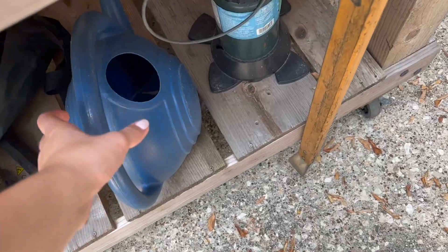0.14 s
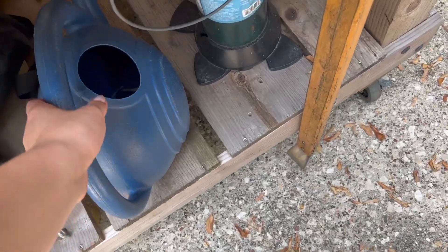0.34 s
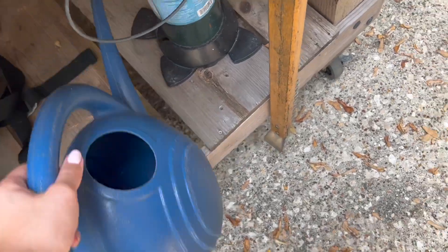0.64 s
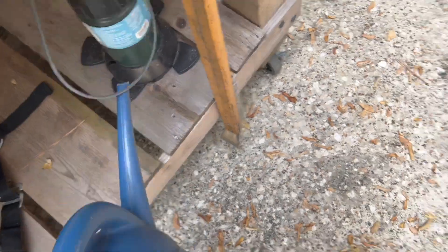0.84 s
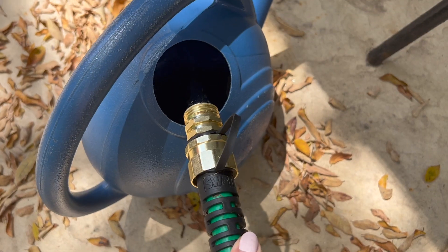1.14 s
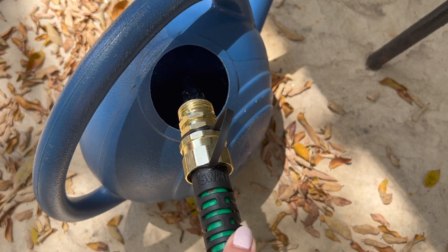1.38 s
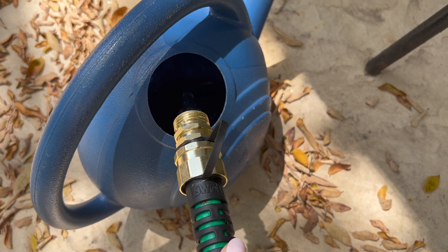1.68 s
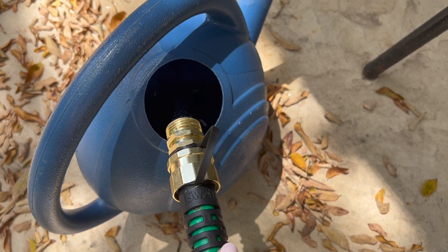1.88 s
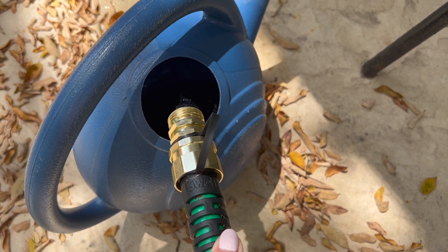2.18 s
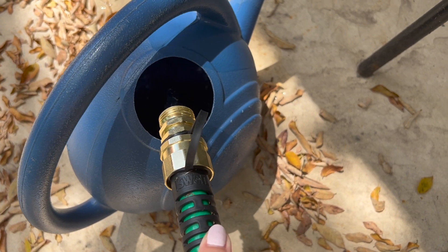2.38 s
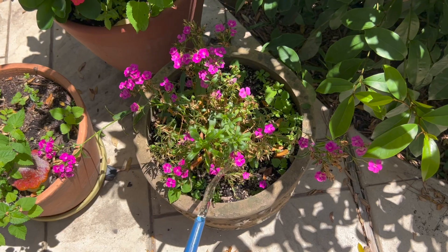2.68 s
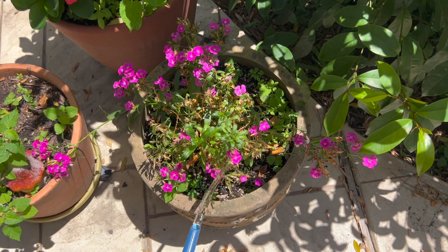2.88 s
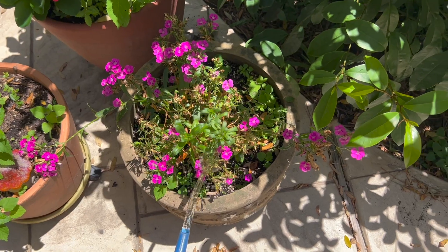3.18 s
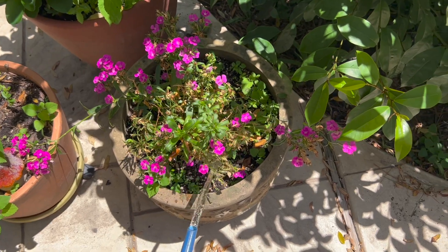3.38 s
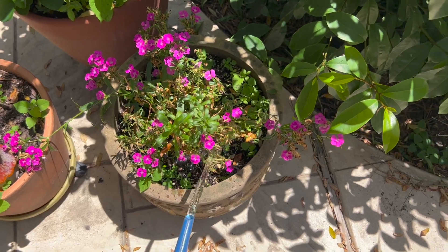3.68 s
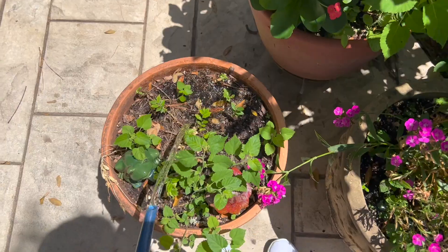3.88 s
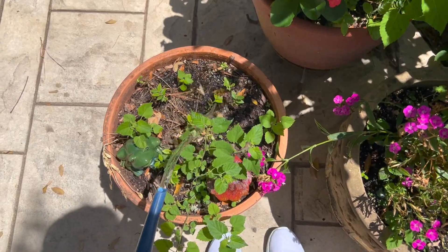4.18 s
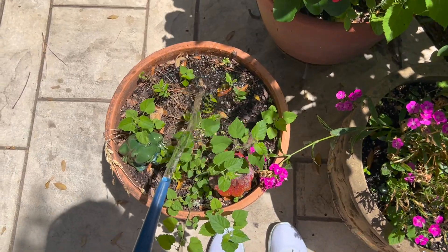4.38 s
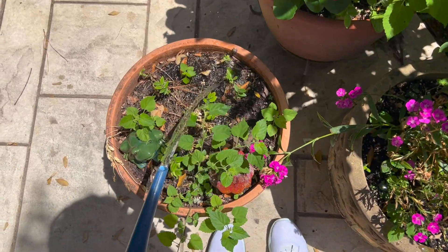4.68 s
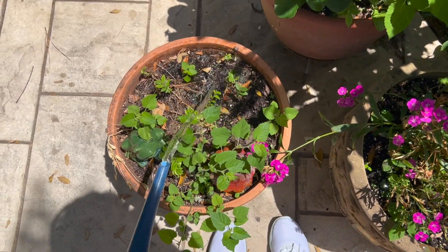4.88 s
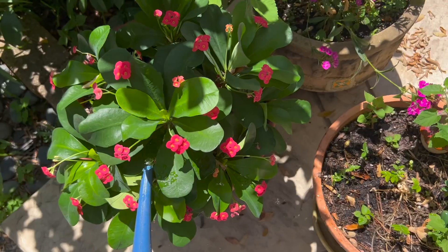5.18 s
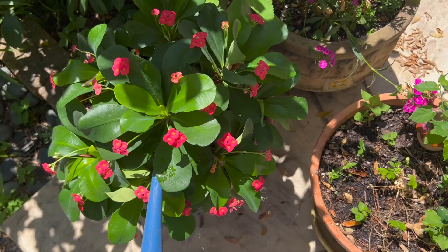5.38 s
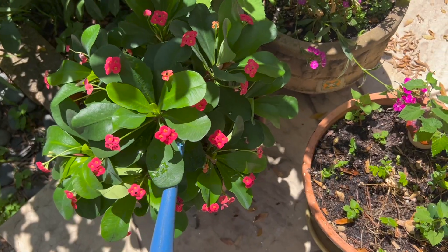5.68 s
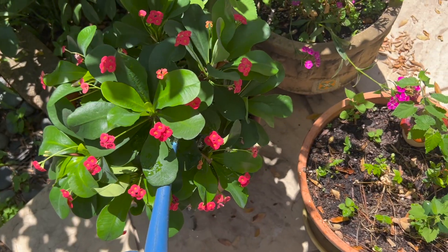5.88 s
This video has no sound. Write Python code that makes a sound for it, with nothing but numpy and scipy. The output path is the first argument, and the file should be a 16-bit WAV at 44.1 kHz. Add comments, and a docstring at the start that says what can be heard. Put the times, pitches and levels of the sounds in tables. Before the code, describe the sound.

Near silence with a dull rumbling air, broken by a loud hollow plastic knock and quick chatter. Next, water gurgles steadily into the can, with round plops, splashes and a motor droning nearby. Abruptly quieter, a thin stream patters on leaves and soil in two pots, then hisses and ticks faintly on a bush amid thin insect-like high tones. Close handheld stereo microphone outdoors, dry, with abrupt changes of place.

```python
"""Watering can on a patio

A plastic can, heard in stereo, knocks a shed shelf, is filled from a hose and waters three pots.
The knock is decaying can modes and noisy clatter; jet and poured stream are shaped noise and swarms of bubbles.
Around them lie washes of noise, low rumbles, thin high line combs and, near the tap, a machine of summed sines.
Five short passages follow one another: shed, tap, two pots, bush."""
import sys
import numpy as np
from scipy import signal
from scipy.fft import rfft, irfft, next_fast_len
from scipy.io import wavfile

SR = 44100
rng = np.random.default_rng(int(sys.argv[2]) if len(sys.argv) > 2 else 0)


def dump_mix(stems):
    """Bounce the given channels to the path in sys.argv[1] as a 16-bit WAV at rate SR."""
    frames = np.atleast_2d(stems).T  # one column per channel
    limited = np.clip(frames, -1, 1)  # hard clip at full scale
    pcm = np.round(limited * 32767).astype(np.int16)
    wavfile.write(sys.argv[1], SR, pcm)


N = 266716
SIZE = next_fast_len(N, True)
TIME = np.arange(N) / SR
HZ = np.fft.rfftfreq(SIZE, 1 / SR)
EDGE_HZ = 15900  # upper band limit

# The five places. Each: start in seconds, end in seconds.
SHED, FILL = (0, .96), (.93, 2.622)
POT_1, POT_2, BUSH = (2.612, 3.756), (3.77, 5.021), (5.056, 6.1)

# Steady wash at each place. Each row: frequency in Hz, density in dB per Hz.
SHED_AIR = [(25, -77), (55, -67), (200, -77), (330, -82.5), (600, -84.5), (1300, -88), (1900, -95.5),
            (3800, -92.5), (6200, -96.5), (8200, -92.5), (11800, -108.0), (15500, -107.0)]
FILL_RUSH = [(20, -115), (55, -60), (120, -64), (180, -71), (300, -76.5), (600, -76), (1300, -82.5),
             (1700, -86.5), (3000, -88), (6000, -90.5), (7200, -88.5), (10500, -100), (15500, -97)]
POT_1_WASH = [(25, -90), (60, -68), (150, -75), (260, -75), (600, -80.5), (1100, -92.5), (1900, -100),
              (2700, -95.5), (4500, -90), (5800, -85.5), (8300, -84.5), (11000, -103), (15500, -93)]
POT_2_WASH = [(25, -80), (60, -72.5), (200, -71.5), (330, -79), (600, -79), (1100, -92.5), (2400, -99.5),
              (3500, -92), (5500, -88.5), (8300, -88), (11500, -102), (15500, -96)]
BUSH_WASH = [(25, -77), (60, -67.5), (200, -74.5), (320, -78.5), (550, -76.5), (1100, -92.5), (2400, -98),
             (3900, -92.5), (4700, -90), (6400, -85.5), (8800, -81.5), (9900, -114), (11500, -93.5),
             (15500, -100.0)]
# Correlation of the left and right channels. Each row: frequency in Hz, correlation from -1 to 1.
CORRELATION = [(60, 0.93), (200, 0.67), (500, -0.26), (1500, -0.06), (4000, 0.6), (7500, 0.55),
               (9700, -0.3), (11500, 0.3), (15000, 0.3)]
# Balance of the left and right channels. Each row: frequency in Hz, left minus right in dB.
LEAN = [(100, -1.5), (400, 0), (1300, 1), (3500, 4.5), (6000, 3), (7500, 0.5)]

# Machine near the tap: its motor speed and orders. Each row: multiple of the speed, relative level in dB.
MOTOR_HZ = 58.9
MOTOR_ORDERS = [(1, -52), (2, -55), (6, -65), (7, -53), (47, -66), (48, -62.5), (50, -59), (52, -68),
                (60, -69)]
# Tones of the machine's fan. Each row: frequency in Hz, relative level in dB.
FAN = [(54.9, -47), (109.8, -49.5), (121.5, -50.5), (383.5, -62.5), (726, -63.5), (1184, -66)]
# Low swells around the pots. Each row: peak time in seconds, level in dB rms,
# centre in Hz, half length in seconds (Gaussian).
SWELLS = [(2.8, -53, 123, 0.092), (2.8, -56, 420, 0.13), (3.4, -52, 430, .13), (3.45, -51, 211, .08),
          (3.6, -44.5, 232, 0.061), (3.57, -53.5, 440, 0.045), (3.78, -48.5, 215, 0.093),
          (4.05, -53, 414, 0.22), (4.43, -48, 204, 0.15), (4.35, -57, 396, 0.12), (4.55, -51, 595, 0.036),
          (4.78, -58, 630, 0.18), (4.93, -47.5, 168, 0.046), (5.25, -47.5, 164, 0.037),
          (5.32, -53, 625, 0.021), (5.55, -51, 70, 0.072), (5.78, -45, 73.3, 0.046),
          (6.0, -47.5, 195, 0.13), (6.03, -46.5, 430, .14)]
SWELL_WIDTH_SHARE = 0.16  # half width of a swell's band, in natural-log frequency
# Thin high buzzes. Each row: start in seconds, end in seconds, centre in Hz, line spacing in Hz,
# half width in Hz, relative level in dB.
BUZZES = [(2.61, 3.75, 7342, 543.9, 300, -69), (2.61, 3.75, 6254, 543.9, 750, -69),
          (4.58, 5.02, 8323, 287.2, 300, -70), (3.77, 4.08, 8616, 287.2, 700, -67),
          (5.05, 6.1, 6469, 497.3, 1500, -63), (5.05, 6.1, 6294, 497, 700, -68),
          (5.05, 6.1, 8035, 497, 1400, -63), (5.2, 6.1, 8387, 497, 1200, -64)]
# Thin held tones. Each row: start in seconds, end in seconds, frequency in Hz, relative level in dB.
TONES = [(2.61, 3.75, 5711, -57.5), (2.61, 3.4, 5167, -58.5), (3.9, 4.5, 4307, -63),
         (4.42, 4.86, 4392, -61.5), (5.24, 5.88, 4231, -58.5), (5.3, 6.1, 4307, -63.5),
         (5.75, 6.1, 4231, -66), (5.3, 6.1, 5475, -65), (5.05, 5.7, 5230, -67), (3.77, 4.06, 7757, -59),
         (4.3, 5.02, 7176, -66), (3.8, 5.02, 1464, -75), (5.05, 6.1, 1468, -71)]

# Blows on the can. Each row: start in seconds, relative ring in dB, centre of the excited modes in Hz,
# relative clatter in dB, clatter decay in seconds (to 1/e).
BLOWS = [(.744, -11.5, 2400, -15.5, 0.032), (0.7442, -42, 6500, -25, .004),
         (0.7506, -13, 910, -20.5, 0.074), (0.762, -10, 7000, -24.5, 0.016),
         (0.777, -18, 3830, -20.5, 0.037), (0.811, -25, 930, -26, 0.029), (0.8425, -31, 8400, -22.5, 0.015),
         (0.85, -38, 1170, -39, 0.036), (0.85, -21.5, 7350, -24.5, 0.023), (.880, -30.5, 1080, -39, 0.024)]
# Modes of the can. Each row: frequency in Hz, relative level in dB, 60 dB decay in seconds,
# left minus right in dB.
CAN = [(194.6, 1, 0.11, 4), (224, -1, 0.11, 7), (647, -11, 0.09, 11), (770, -8, 0.1, 11),
       (1164, -5.5, 0.029, 24), (1250, -9, 0.058, 26), (1274, -14, 0.058, 20), (1744, -10, 0.063, -1),
       (2027, -6.5, 0.046, 7), (2170, -18, 0.16, 9), (2430, -11, 0.019, 21), (3300, -20, 0.069, -3),
       (4354, -10.5, 0.16, 3), (4815, -18.5, 0.11, 1), (5880, -26, 0.067, -2), (7365, -15, 0.099, -1),
       (8500, -20, .14, 0), (14760, -18, .1, 0), (15504, -14, 0.2, 0)]
# Colour of the clatter. Each row: frequency in Hz, relative level in dB.
CLATTER = [(60, 2), (200, 25), (400, 8.5), (1000, 6), (2300, -2), (3300, -9), (5000, -7), (8000, -4.5),
           (11000, -4.5), (15500, -4.5)]
# Plastic wall: typical 60 dB decay in seconds, energy share of the direct click, lowest mode in Hz.
WALL_T60_S, WALL_DIRECT_SHARE, WALL_LOW_HZ = .04, .5, 2500
# Dull bumps of the can in the hand. Each row: start in seconds, relative level in dB, pitch in Hz.
BUMPS = [(1.087, -21.5, 455), (5.001, -28, 430), (5.13, -41, 960), (5.178, -36.5, 780), (5.197, -33.5, 650),
         (.049, -37, 580)]
BUMP_RING_S = 0.016  # 60 dB decay
# Colour of a bump's thud. Each row: frequency in Hz, relative level in dB.
THUD = [(200, 4.0), (700, 0), (2500, -20), (8000, -37)]

# Fat drops on a leaf, trapping no bubble. Each row: start in seconds, relative level in dB.
LEAF_TICKS = [(2.953, -33), (2.988, -35), (3.033, -34.5), (3.116, -32), (3.486, -34.5), (3.673, -33.5),
              (3.735, -34), (3.835, -38), (4.604, -41), (5.297, -41)]
# Colour of a slap on water or leaf. Each row: frequency in Hz, relative level in dB.
SLAP = [(200, -22), (1500, 1), (4000, 5), (7500, 15), (11000, 3.5), (15500, 7.5)]
# Loudest splashes. Each row: start in seconds, bubble level in dB, bubble pitch in Hz, relative slap in dB.
SPLASHES = [(1.011, -42, 1120, -44), (1.13, -38, 2700, -54), (1.388, -44, 1144, -84),
            (1.502, -35.5, 1280, -46), (1.643, -29.5, 7340, -42), (1.69, -30, 1420, -31.5),
            (1.922, -39, 1116, -48), (2.005, -39, 5000, -47), (2.032, -34.5, 1260, -63),
            (2.092, -36.5, 2050, -31), (2.118, -31, 1244, -35), (2.436, -36.5, 1170, -32.5),
            (2.512, -40, 5640, -40.5), (2.552, -39.5, 1374, -63), (3.53, -44, 2580, -31),
            (4.333, -42, 3660, -33.5), (1.036, -44, 1220, -52), (1.465, -43, 2710, -39),
            (1.535, -42, 2180, -39), (1.571, -58, 5170, -43), (1.613, -42, 730, -60),
            (1.76, -46, 1290, -52), (1.896, -49, 703, -39), (2.015, -44, 1580, -60),
            (2.076, -43, 2820, -40), (2.282, -41, 1270, -54), (2.378, -40, 1390, -55),
            (2.416, -45, 5300, -40), (2.471, -42, 1380, -52), (2.607, -44, 5140, -41),
            (4.128, -40, 6780, -54), (4.224, -45, 1130, -60), (4.259, -39, 3800, -58),
            (4.42, -39, 5340, -44), (4.741, -48, 1850, -58), (4.176, -38.5, 3260, -52),
            (4.453, -40, 3320, -51), (4.531, -44, 1900, -53), (4.688, -44, 3630, -54),
            (4.865, -44.5, 3070, -62)]
# A bubble's 60 dB decay is RING_S at RING_HZ, shorter when smaller (higher); soil keeps only a share of it.
RING_S, RING_HZ, RING_SLOPE, SOIL_RING_SHARE = 0.065, 1310, 0.22, 0.43
# Lesser bubbles of a splash: relative level in dB, range in octaves, time spread as a share of the main ring.
HUDDLE_DB, HUDDLE_OCTAVES, HUDDLE_RINGS = -16, 0.88, .8
# Clumps of water bursting in the can or on plants. Each row: start in seconds, level in dB rms,
# centre in Hz, length in seconds.
CLUMPS = [(1.036, -43, 3760, 0.012), (1.088, -43, 1810, 0.009), (1.128, -46, 3900, 0.015),
          (1.163, -44.5, 4060, 0.013), (1.438, -54, 2180, 0.0089), (1.459, -43, 2170, 0.014),
          (1.501, -45, 1490, 0.0088), (1.537, -60, 4400, 0.014), (1.891, -47.5, 3020, 0.023),
          (1.923, -48, 2020, 0.019), (2.009, -47.5, 1680, 0.019), (2.073, -48, 3130, 0.013),
          (2.113, -48, 2250, 0.021), (2.315, -46, 4700, 0.033), (2.382, -45.5, 1640, 0.027),
          (2.416, -48, 4750, .014), (2.417, -47, 1300, 0.027), (2.468, -48, 1400, 0.018),
          (2.514, -47.5, 1940, 0.014), (2.552, -43.5, 1650, 0.016), (2.857, -56, 2300, 0.0061),
          (2.901, -51, 3150, 0.0086), (2.942, -55, 4000, 0.012), (2.958, -52, 3080, 0.0081),
          (2.98, -56, 3400, 0.0056), (3.023, -58, 1970, 0.02), (3.112, -48, 3080, 0.0035),
          (3.301, -52, 3040, 0.012), (3.421, -58, 3630, .008), (3.476, -53, 4130, 0.0098),
          (3.518, -48.5, 3130, 0.0082), (3.655, -53.5, 3320, 0.012), (3.721, -53.5, 2930, 0.022),
          (4.153, -51, 4400, 0.0092), (4.17, -53, 4000, 0.0067), (4.213, -56, 1320, 0.0097),
          (4.252, -57, 3600, 0.0046), (4.335, -51, 2680, 0.0078), (4.416, -50, 4960, 0.0081),
          (4.432, -46, 5000, 0.014), (4.442, -56, 2920, 0.021), (4.528, -55, 2320, 0.013),
          (4.593, -64, 2410, 0.011), (4.684, -50.5, 3600, 0.013), (4.701, -57, 2600, 0.0061),
          (4.737, -56, 2580, 0.011), (4.862, -58, 3200, 0.011), (1.012, -49, 1500, .012),
          (1.234, -50, 4000, 0.01), (1.258, -51, 1500, 0.018), (1.576, -53, 1910, .015),
          (2.185, -51, 1600, .02), (2.281, -50, 1490, .02)]
# Inside a clump: pitch range, cycles to a 60 dB decay, crowding to the start, greatest left-right scatter.
CLUMP_OCTAVES, CLUMP_CYCLES, CLUMP_FRONT, CLUMP_SCATTER_DB = 1.28, 15, 1.6, 24

# Water-filled can under the jet. Each row: resonance in Hz, width in Hz, level in dB rms.
HOLLOW = [(115.2, 10, -47), (233.4, 9.9, -55), (399, 49, -57), (1237, 17, -63), (1820, 15, -75),
          (2050, 28, -64.5), (2760, 17, -62.5), (7600, 130, -62)]
GURGLE_DB = -52.5  # rms of the even bubbling under the jet
# Surges of the jet. Each row: start in seconds, relative strength in dB.
SURGES = [(1.04, -55), (1.45, -49.5), (1.89, -69), (2.08, -59), (2.38, -61)]
SURGE_RISE_S, SURGE_SETTLE_S, CALM_DB = 0.083, 0.067, -69.5
# Colour of the spray in the can. Each row: frequency in Hz, relative level in dB.
SPRAY = [(200, -15), (700, -51), (1300, 9), (2200, -9), (4000, -8), (8000, -1), (15500, 4)]
# Passes of the stream over leaves. Each row: start in seconds, hold in seconds, relative spatter in dB.
PASSES = [(2.826, 1, -60.5), (4.12, 0.33, -64), (5.107, 0.29, -70)]
PASS_RISE_S, PASS_FADE_S, DRIBBLE_DB = 0.023, 0.22, -72  # only a dribble lands between passes
# Colour of drops on the plants. Each row: frequency in Hz, relative level in dB.
DROPS = [(200, -14), (700, 16), (1400, 6), (2700, 20), (4000, 23), (7500, 18), (11000, 13), (15500, 12)]


def amp(db):
    """Decibels to gain."""
    return 10 ** (np.asarray(db) / 20)


def evened(x):
    """Scaled to rms 1."""
    return x / np.sqrt(np.mean(abs(x) ** 2) + 1e-20)


def read(points, hz):
    """A spectrum table joined by lines on a log-frequency axis."""
    f, value = np.transpose(points)
    return np.interp(np.log(hz + 1), np.log(f + 1), value)


def add(mix, s, sound):
    """Mixes a sound in at time s."""
    part = mix[..., max(round(s * SR), 0):][..., :sound.shape[-1]]
    part += sound[..., :part.shape[-1]]


def during(start, end, fade=0.002):
    """1 between two times, with short ramps."""
    rise = np.clip((TIME - start) / fade, 0, 1)
    return rise * np.clip((end - TIME) / fade, 0, 1)


def filtered(x, gain):
    """x through a filter given as a gain for every frequency."""
    return irfft(rfft(x, SIZE) * gain, SIZE)[..., :N]


def drift(per_s):
    """Slow random wander of rms 1."""
    return evened(filtered(rng.standard_normal(N), np.exp(-(HZ / per_s) ** 2)))


def heard(envelope, colour):
    """Noise under an envelope, coloured, with left and right correlated and balanced by frequency."""
    a, b = rfft(rng.standard_normal((2, N)) * envelope, SIZE)
    correlation = np.clip(read(CORRELATION, HZ), -1, 1)
    lean = amp(read(LEAN, HZ) / 2)
    left = a * lean
    right = (correlation * a + np.sqrt(1 - correlation ** 2) * b) / lean
    return irfft(np.array([left, right]) * colour, SIZE)[:, :N]


def bursts(sizes, decay):
    """Envelope of impacts that start at once and die exponentially."""
    power = signal.lfilter([1], [1, -np.exp(-2 / (decay * SR))], sizes ** 2)
    return np.sqrt(power + 1e-20)


def patter(per_s, spread_db, decay):
    """Envelope of randomly falling drops, mostly small, a few large, rms 1."""
    falls = rng.random(N) < per_s / SR
    sizes = amp(spread_db * np.minimum(rng.exponential(1, N), 4)) * falls
    return evened(bursts(sizes, decay))


def resonance(hz, width):
    """A narrow resonance excited at random, rms 1."""
    return evened(filtered(rng.standard_normal(N), 1 / (1 + ((HZ - hz) / width) ** 2)))


def bubble(hz, t60, rise=0.053):
    """A trapped bubble rings and dies away, its pitch rising as it nears the surface."""
    t = np.arange(0, t60, 1 / SR)
    envelope = amp(-60 * t / t60) * (1 - np.exp(-t * hz))
    return envelope * np.sin(2 * np.pi * hz * t * (1 + rise * t / t60))


def bubbles(count, passage, low_hz, high_hz, cycles, spread_db):
    """A swarm of bubbles or droplets of mixed size, rms 1 in its passage, with small left-right delays."""
    out = np.zeros((2, N))
    for when, pitch, size, side, lag in rng.random((count, 5)):
        hz = low_hz * (high_hz / low_hz) ** pitch
        s = passage[0] + when * (passage[1] - passage[0])
        ring = amp(-spread_db * np.log(size + .03)) * bubble(hz, cycles / hz)
        # beyond LEAN, the swarm sits 8 to 9 dB towards the right
        lean = amp(read(LEAN, hz) / 2 + 0.77 * (side - 6.0))
        add(out[0], s + 0.00043 * (lag - .5), ring * lean)
        add(out[1], s, ring / lean)
    return evened(out) * np.sqrt(np.mean(during(*passage)))


def steady(passage, spectrum, grain):
    """The even wash of a place, wavering slightly; grain is the share that arrives as tiny drops."""
    grain = np.clip(grain, 0, 1)
    texture = np.sqrt(1 - grain + grain * patter(1700, 0.53, 0.00013) ** 2)
    envelope = texture * amp(.5 * drift(9.0))
    return heard(envelope, amp(read(spectrum, HZ)) * np.sqrt(SR / 2)) * during(*passage)


def machine(waver_db=1):
    """A machine near the tap, probably an air conditioner, hums: motor orders and fan tones waver together."""
    lines = [(MOTOR_HZ * order, db) for order, db in MOTOR_ORDERS] + FAN
    clock = np.cumsum(1 + .0003 * drift(8)) / SR  # a slightly uneven speed
    hum = sum(amp(db) * np.sin(2 * np.pi * (hz * clock + rng.random())) for hz, db in lines)
    return hum * amp(waver_db * drift(26)) * during(*FILL)


def rumble():
    """A low, hollow rumble comes and goes in swells of band-limited noise, each around its own pitch."""
    out = np.zeros((2, N))
    t = np.arange(SR) / SR - .5
    hz = np.fft.rfftfreq(SR, 1 / SR)
    for s, db, centre_hz, half in SWELLS:
        band = 1 / (1 + (np.log((hz + 1) / centre_hz) / SWELL_WIDTH_SHARE) ** 2)
        a, b = irfft(rfft(rng.standard_normal((2, SR))) * band, SR)
        correlation = np.clip(read(CORRELATION, centre_hz), -1, 1)
        swell = np.exp(-.5 * (t / half) ** 2)
        pair = np.array([a, correlation * a + np.sqrt(1 - correlation ** 2) * b]) * swell
        add(out, s - .5, amp(db) * evened(pair) * np.sqrt(np.mean(swell ** 2)))
    return out * (during(*POT_1) + during(*POT_2) + during(*BUSH))


def buzzes(chorus_db=8.5, flutter_db=2.5):
    """A thin high buzz: combs of evenly spaced lines, each fading in and out at its own pace."""
    out = np.zeros((2, N))
    for start, end, centre_hz, spacing_hz, width, db in BUZZES:
        gate = during(start, end, fade=0.029)
        on = gate > 0
        clock = np.cumsum(1 + .0005 * drift(30)[on]) / SR
        offset = spacing_hz * np.arange(-5, 6)[:, None]
        body = np.exp(-(offset / width) ** 4)
        # every line has its own phase in each channel
        phases = rng.random(offset.shape) + 0.2 * rng.standard_normal((2, *offset.shape))
        pace = rng.uniform(.5, 2, offset.shape)
        fading = amp(3 * np.sin(2 * np.pi * (clock * pace + rng.random(offset.shape))))
        lines = np.cos(2 * np.pi * ((centre_hz + offset) * clock + phases))
        song = evened((body * fading * lines).sum(1))
        out[:, on] += song * (gate * amp(db + chorus_db + flutter_db * drift(33)))[on]
    return out


def held_tones():
    """Single thin sines swell and sink, slightly unsteady in pitch and level, a little to the left."""
    out = np.zeros((2, N))
    for start, end, hz, db in TONES:
        note = evened(np.sin(2 * np.pi * np.cumsum(hz * (1 + .0008 * drift(50))) / SR))
        swell = np.interp(TIME, [start, .7 * start + .3 * end, end], [.7, 1.25, .65])
        waver = amp(.8 * drift(40))
        gate = during(start, end, fade=0.016)
        out += amp(db) * waver * note * swell * gate * amp([[1], [-2]])
    return out


def touch():
    """The hand closes on the handle and the empty can hums softly."""
    return amp(-44.0) * np.sin(2 * np.pi * 208 * TIME) * during(0.412, 0.592, fade=0.073)


def wall(count=90):
    """The plastic wall answers one tap: a direct click and a crowd of short modes, energy 1 per channel."""
    t = np.arange(SR // 5) / SR
    ring = np.zeros((2, len(t)))
    for k, (place, life, left, right) in enumerate(rng.random((count, 4))):
        hz = WALL_LOW_HZ + (EDGE_HZ - WALL_LOW_HZ) * (k + 2 * place) / count
        mode = amp(-60 * t / (WALL_T60_S * (.5 + life))) * np.cos(2 * np.pi * hz * t)
        ring += np.array([[.5 + left], [.5 + right]]) * mode
    ring *= np.sqrt(2 * (1 - WALL_DIRECT_SHARE) / np.sum(ring ** 2))
    ring[:, 0] = np.sqrt(WALL_DIRECT_SHARE)
    return ring


def knock(reach=0.35, chatter_db=3, tail_db=-50, tail_decay=0.031):
    """The can rattles along the shelf: contacts excite modes near their own pitch, chatter rings the wall."""
    out, rattle = np.zeros((2, N)), np.zeros((2, N))
    t = np.arange(SR // 2) / SR
    colour = amp(read(CLATTER, HZ))
    for s, ring_db, centre_hz, clatter_db, decay in BLOWS:
        for k, (hz, db, t60, lean_db) in enumerate(CAN):
            share = 1 / (1 + (np.log(hz / centre_hz) / reach) ** 2) + 0.22
            # neighbouring modes move the struck spot in opposite directions
            swing = (-1) ** k * np.sin(2 * np.pi * hz * t) * (1 - np.exp(-t / 0.00016))
            ring = amp(ring_db + db - 60 * t / t60) * share * swing
            add(out, s, ring * amp([[lean_db / 2], [-lean_db / 2]]))
        clatter = np.zeros(N)
        add(clatter, s, amp(clatter_db) * np.exp(-t / decay))
        near = 1 / (1 + np.log((HZ + 1) / centre_hz) ** 2) + 0.024
        chatter = patter(1200, chatter_db, 0.0008)
        rattle += heard(clatter * chatter, evened(colour * near))
    tail = np.zeros(N)  # the shed answers
    add(tail, BLOWS[1][0], amp(tail_db) * np.exp(-t / tail_decay))
    walled = signal.oaconvolve(rattle, wall(), axes=1)[:, :N]
    return out + walled + heard(tail, evened(colour))


def bumps(thud_db=-9, thud_decay=0.0065):
    """The can is bumped in the hand: a short ring and a dull thud of noise."""
    out, thuds = np.zeros(N), np.zeros(N)
    for s, db, hz in BUMPS:
        add(out, s, amp(db) * bubble(hz, BUMP_RING_S, rise=0))
        add(thuds, s, amp([db + thud_db]))
    return out + heard(bursts(thuds, thud_decay), evened(amp(read(THUD, HZ))))


def leaf_ticks(decay=0.0034):
    """Fat drops hit single leaves with a short, bright smack of noise."""
    hits = np.zeros(N)
    for s, db in LEAF_TICKS:
        add(hits, s, amp([db]))
    return heard(bursts(hits, decay), evened(amp(read(SLAP, HZ))))


def plops(slap_decay=0.0058, lesser_ring_share=0.22, count=10):
    """Larger splashes: a slap, one bubble that rings longer the lower it is, and a huddle of lesser bubbles."""
    out, slaps = np.zeros(N), np.zeros(N)
    for s, db, hz, slap_db in SPLASHES:
        ground = 1 if s < FILL[1] else SOIL_RING_SHARE
        t60 = RING_S * (RING_HZ / hz) ** RING_SLOPE * ground
        add(out, s, amp(db) * bubble(hz, t60))
        for delay, octaves, size in rng.random((count, 3)):
            lesser_hz = hz * 2 ** (HUDDLE_OCTAVES * (octaves - .5))
            lesser = bubble(lesser_hz, lesser_ring_share * t60)
            add(out, s + HUDDLE_RINGS * t60 * delay, amp(db + HUDDLE_DB) * size * lesser)
        add(slaps, s, amp([slap_db]))
    return out + heard(bursts(slaps, slap_decay), evened(amp(read(SLAP, HZ))))


def clumps(count=30):
    """A clump of water bursts into a quick shower of tiny bubbles and droplets around one pitch."""
    out = np.zeros((2, N))
    for s, db, centre_hz, length in CLUMPS:
        shower = np.zeros((2, SR // 4))
        for when, pitch, size, side in rng.random((count, 4)):
            hz = centre_hz * 2 ** (CLUMP_OCTAVES * (pitch - .5))
            lean_db = read(LEAN, hz) / 2 + CLUMP_SCATTER_DB * (side - .5)
            droplet = size * bubble(hz, CLUMP_CYCLES / hz)
            add(shower, length * when ** CLUMP_FRONT, droplet * amp([[lean_db], [-lean_db]]))
        # rms 1 over the clump's length
        add(out, s, amp(db) * shower * np.sqrt(2 * length * SR / np.sum(shower ** 2)))
    return out


def churning():
    """How hard the jet stirs the water: a calm level plus surges that swell and settle."""
    level = amp(CALM_DB)
    for s, db in SURGES:
        age = np.maximum(TIME - s, 0)
        level = level + amp(db) * np.minimum(age / SURGE_RISE_S, 1) * np.exp(-age / SURGE_SETTLE_S)
    return level


def filling():
    """The jet drums the hollow can and gurgles steadily; surges throw spray and drive bubbles under the surface."""
    drone = sum(amp(db) * resonance(hz, width) for hz, width, db in HOLLOW)
    spray = amp(15.0) * heard(patter(310, 4.3, 0.0036), evened(amp(read(SPRAY, HZ))))
    large = amp(-3) * bubbles(750, FILL, 900, 2600, cycles=16, spread_db=3)
    small = amp(-3) * bubbles(600, FILL, 2000, 9000, cycles=34, spread_db=4.5)
    gurgle = amp(GURGLE_DB) * bubbles(650, FILL, 750, 5000, cycles=18, spread_db=3.8)
    return (drone + gurgle + churning() * (spray + large + small)) * during(*FILL)


def spattering():
    """How much of the stream hits leaves: each pass rises, holds and fades, and ends with its passage."""
    level = amp(DRIBBLE_DB)
    for (s, hold, db), passage in zip(PASSES, (POT_1, POT_2, BUSH)):
        rise = np.clip((TIME - s) / PASS_RISE_S, 0, 1)
        fade = np.exp(-np.maximum(TIME - s - hold, 0) / PASS_FADE_S)
        level = level + amp(db) * rise * fade * during(*passage)
    return level


def pouring(clump_db=2.5, bush_tick_db=9):
    """The uneven stream spatters and froths on soil and leaves; the stiff leaves of the bush tick brightly."""
    flow = spattering() * amp(clump_db * drift(28))
    pots = during(*POT_1) + during(*POT_2)
    bush = during(*BUSH)
    patio = (POT_1[0], BUSH[1])
    drops = amp(0.5) * heard(patter(150, 3, 0.001), evened(amp(read(DROPS, HZ))))
    froth = bubbles(750, patio, 2500, 6800, cycles=17, spread_db=4.5)
    trickle = amp(-8) * bubbles(450, patio, 1100, 3600, cycles=9, spread_db=4.5)
    ticks = amp(-2) * bubbles(800, patio, 5000, 15500, cycles=16, spread_db=5.5)
    on_pots = (drops + froth + trickle + ticks) * pots
    return flow * (on_pots + amp(bush_tick_db) * ticks * bush)


def scene():
    """All five places in a row, over a faint hush that runs throughout."""
    wash = steady(SHED, SHED_AIR, 0.015) + steady(FILL, FILL_RUSH, 0.38)
    wash += steady(POT_1, POT_1_WASH, 0.39) + steady(POT_2, POT_2_WASH, 0.45)
    wash += steady(BUSH, BUSH_WASH, 0.12)
    wash += amp(-27) * steady((0, 7), POT_2_WASH, 0)
    around = wash + machine() + rumble() + buzzes() + held_tones()
    can = touch() + knock() + bumps()
    water = leaf_ticks() + plops() + clumps() + filling() + pouring()
    return around + can + water


def record(dry):
    """The microphone drops the deepest bass; then the band limit."""
    thin = signal.sosfilt(signal.butter(2, 28, "high", fs=SR, output="sos"), dry)
    band = signal.firwin(511, EDGE_HZ, window=("kaiser", 9), fs=SR)
    return signal.oaconvolve(thin, band[None], "same")


dry = scene()
out = record(dry)
dump_mix(out)
```